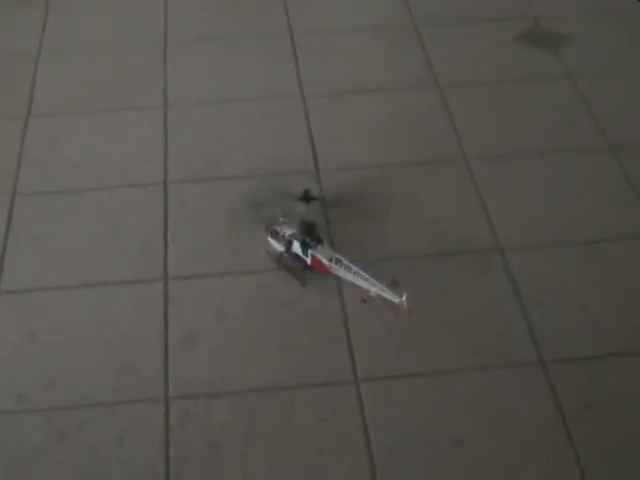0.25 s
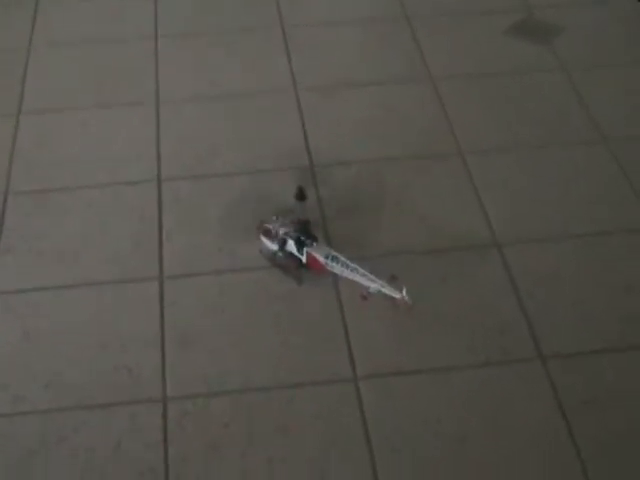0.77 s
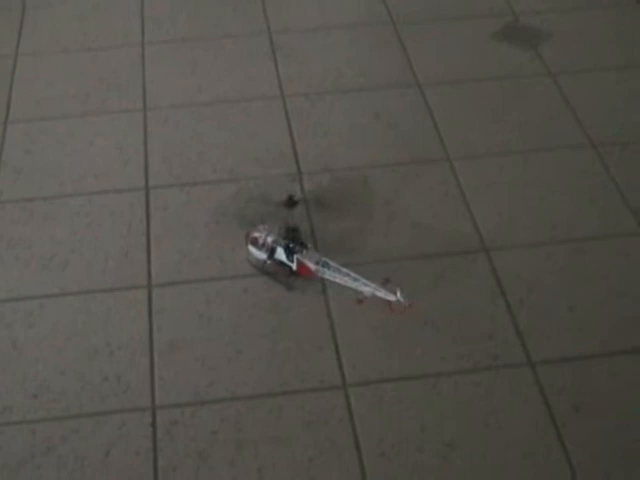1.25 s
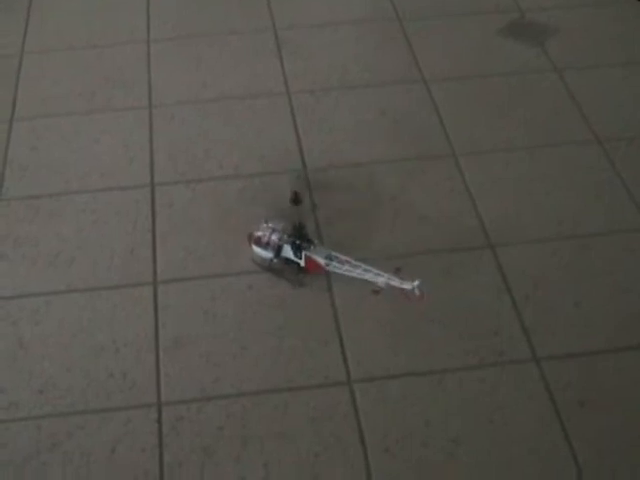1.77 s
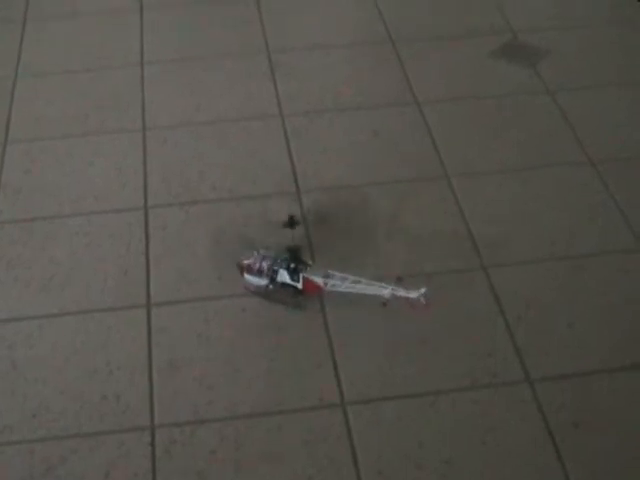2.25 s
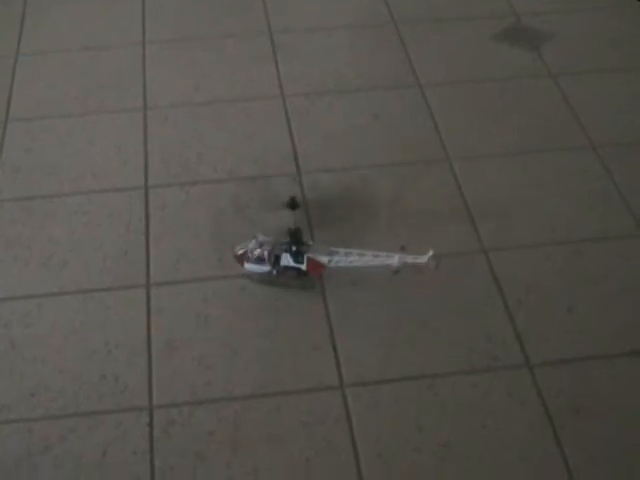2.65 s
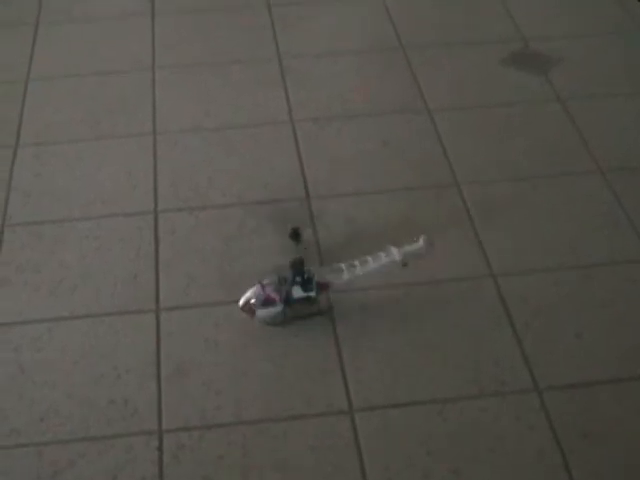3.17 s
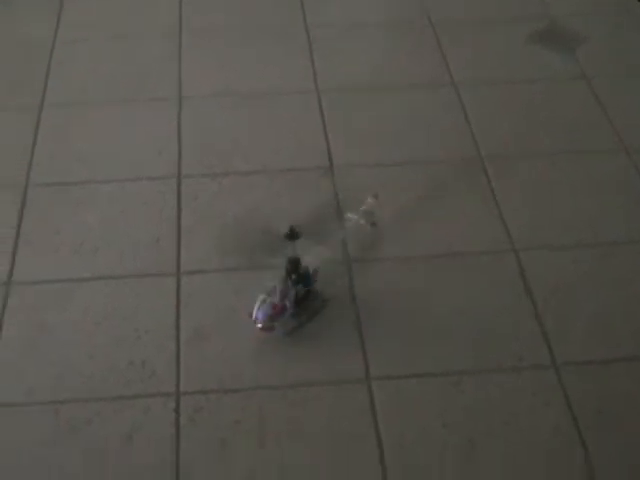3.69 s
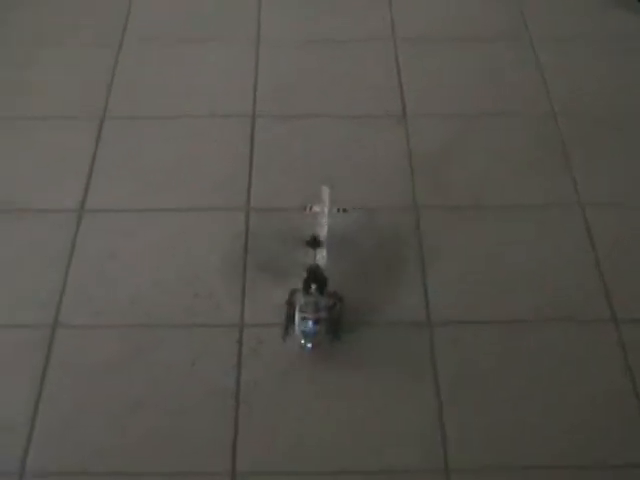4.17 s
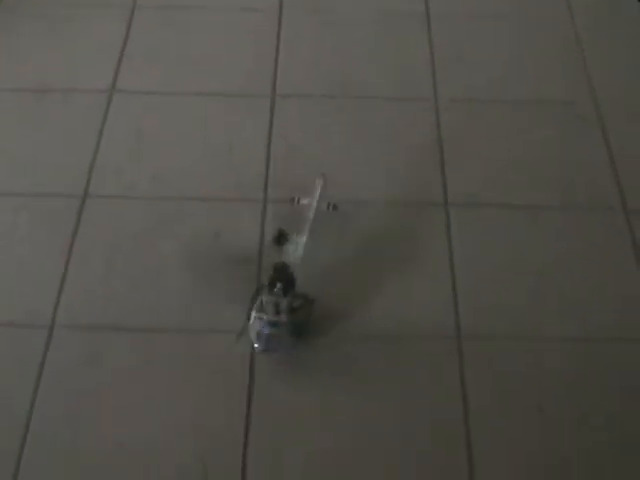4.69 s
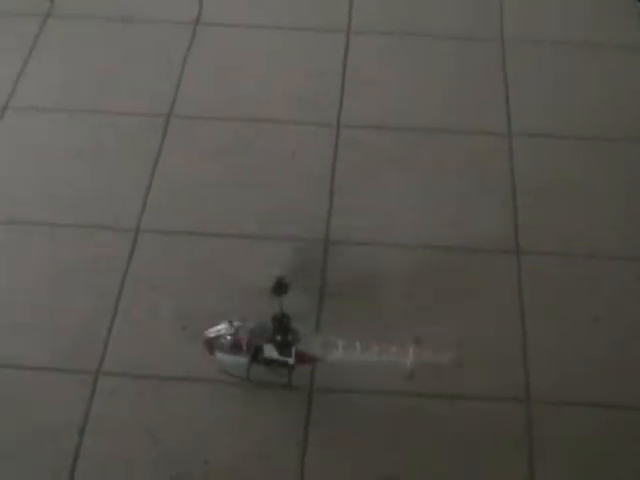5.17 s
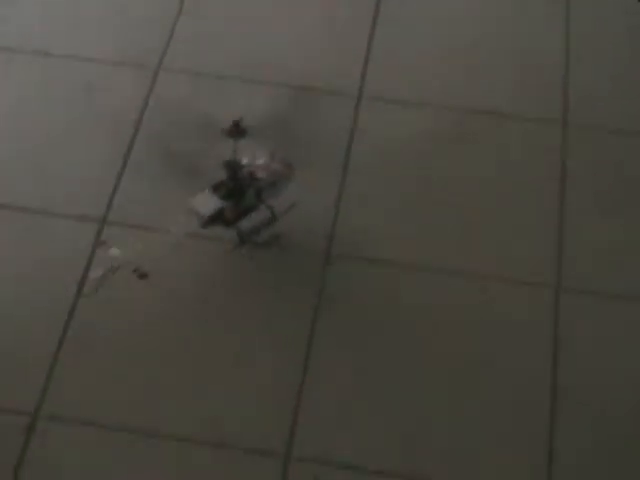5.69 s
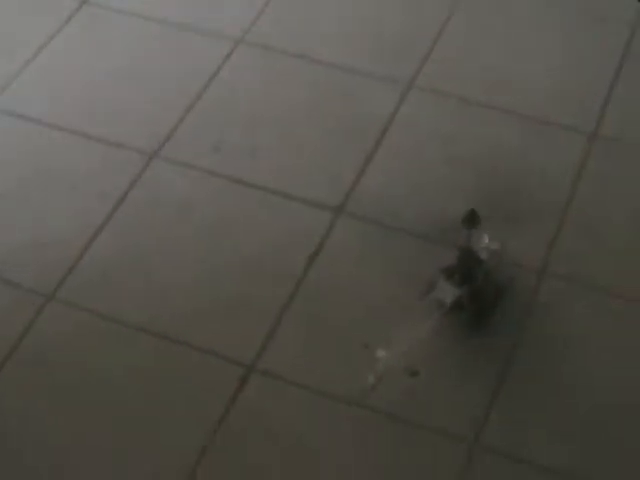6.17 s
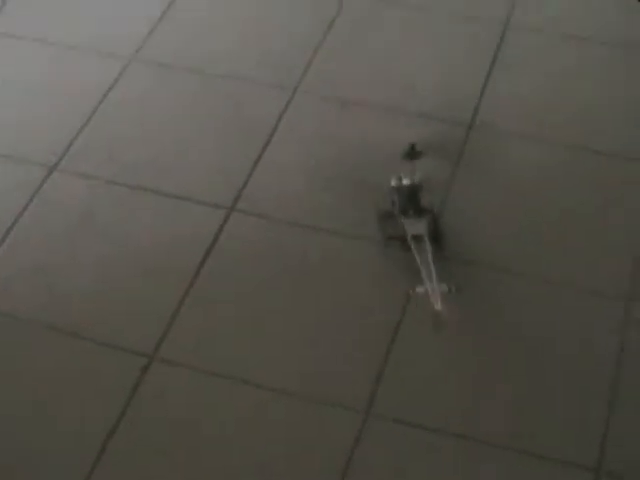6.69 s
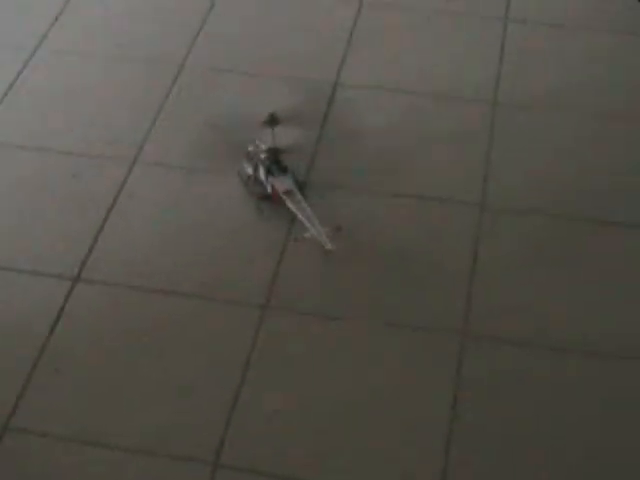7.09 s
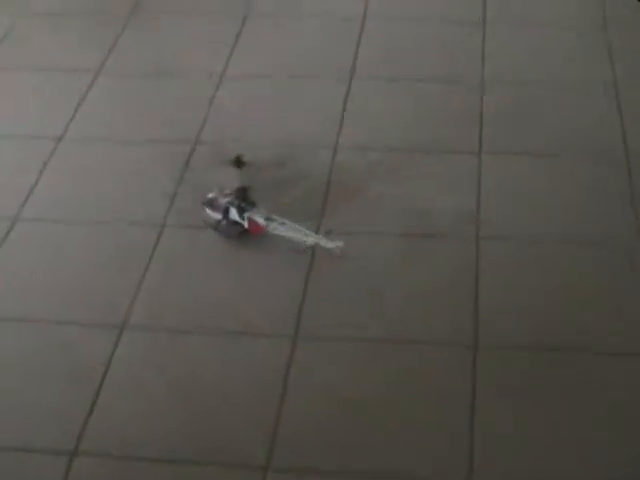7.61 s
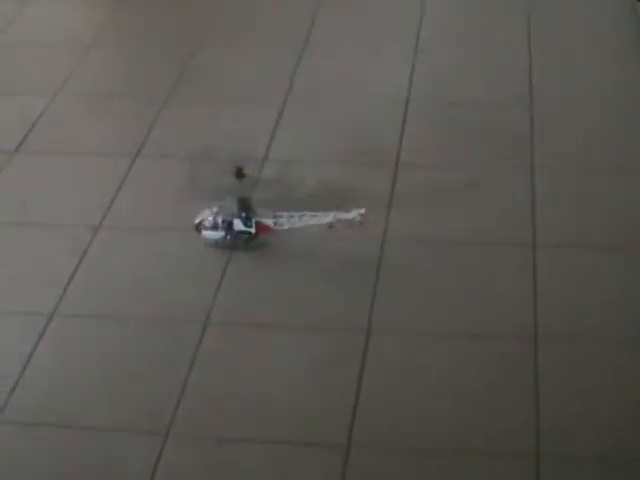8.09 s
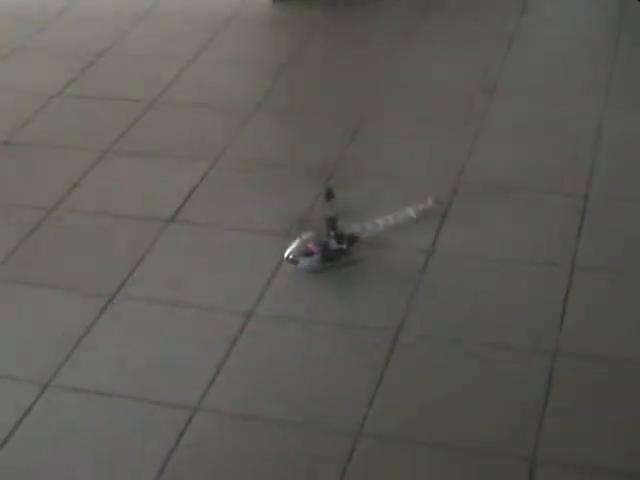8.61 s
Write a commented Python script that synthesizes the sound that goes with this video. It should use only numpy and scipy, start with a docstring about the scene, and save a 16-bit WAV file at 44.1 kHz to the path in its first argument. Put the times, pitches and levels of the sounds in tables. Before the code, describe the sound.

At once a sharp, close tap on the microphone bumps out, overloaded and very short, followed by two faint dull knocks before 0.2 s. Under it a toy helicopter's two small electric motors are already whining. From 0 to about 3 s they climb, quickly at first, one a little behind the other, into a shrill buzzing pair of tones around 1.7 to 1.9 kHz with brighter overtones, gear rattle and a dry rush of blades. The whine holds fairly steady near 4 s, one motor still creeping up until 5.3 s. A soft knock comes at 4.8 s, a tight cluster at 5.6 to 5.7 s as that motor drops in pitch, and a faint one at 6.3 s. The sound flutters and throbs more until about 7.7 s, then settles; a last knock at 8.7 s. It is still running at the end, in a bare reverberant hall.

```python
"""In a bare, echoing hall, a toy helicopter with two stacked rotors runs up on a tiled floor.
Two small motors with eight-tooth pinions whine at their own speeds: shaken tones at shaft orders.
Gear rattle and blade rush are shaped noise; a few dull knocks are decaying sines in the hall.
One tap on the recorder opens the scene; two close microphone ports hear it all."""
import sys
import numpy as np
from scipy import signal
from scipy.fft import rfft, irfft, next_fast_len
from scipy.io import wavfile
from scipy.ndimage import uniform_filter1d

SR = 44100
rng = np.random.default_rng(int(sys.argv[2]) if len(sys.argv) > 2 else 0)


def int16_out(signal):
    """Quantize to a 16-bit WAV file."""
    q = np.round(np.clip(np.atleast_2d(signal).T, -1, 1) * 32767)
    wavfile.write(sys.argv[1], SR, q.astype(np.int16))


N = 390285


def gain_of(db):
    """Decibels to amplitude gain."""
    return 10 ** (np.asarray(db) / 20)


def evened(x):
    """Scales to rms 1."""
    return x / np.sqrt(np.mean(abs(x) ** 2) + 1e-20)


def read(points, hz):
    """Columns of a table interpolated on a log-frequency axis."""
    f, *columns = np.transpose(points)
    return np.array([np.interp(np.log(hz + 1), np.log(f + 1), c) for c in columns])


def curve(rows, t):
    """Columns of a table interpolated over time."""
    s, *columns = np.transpose(rows)
    return [np.interp(t, s, c) for c in columns]


def wobble(hz):
    """Complex low-passed noise, rms 1, wandering about hz times a second."""
    step = 32  # samples between drawn points
    pole = np.exp(-2 * np.pi * hz * step / SR)
    a, b = rng.standard_normal((2, N // step + 1))
    slow = evened(signal.lfilter([1], [1, -pole], a + 1j * b))
    return np.interp(np.arange(N) / step, np.arange(len(a)), slow)


# decay of the hall: [band_hz, t60_s]
HALL_DECAY = [(200, 1.74), (1500, 1.77), (8000, 0.14)]


def hall(x):
    """Sparse random-sign taps; each band dies at its own speed, with equal energy in all bands."""
    taps = np.zeros(2 * SR)
    at = np.arange(500, 2 * SR - 20, 20)
    taps[at + rng.integers(0, 20, len(at))] = rng.choice([-1., 1.], len(at))
    hz, t, bands = signal.stft(taps, SR, nperseg=512)
    t60 = read(HALL_DECAY, hz)[0][:, None]
    decayed = bands * gain_of(-60 * t / t60) / np.sqrt(t60)
    tail = signal.istft(decayed, SR, nperseg=512)[1]
    return signal.fftconvolve(x, tail / np.linalg.norm(tail))[:N]


# what the knocks ring with: [pitch_hz, level_db, t60_s]
KNOCK_RING = [(176.5, 0.5, 0.2), (266, -9, 0.19), (296, 3, 0.14), (367, -4, 0.082), (438, -1, 0.16)]
# knocks somewhere in the hall: [start_s, level_db, blow_hz, tick_amount, ring_share]
KNOCKS = [(0.075, -26, 390, 0.3, .05), (0.147, -30, 310, .3, .05), (4.801, -28, 358, -0.5, .3),
          (5.611, -24, 440, -.8, .4), (5.637, -18.5, 330, -5.5, .45), (5.667, -22, 280, .3, .4),
          (5.723, -24, 400, -.5, .3), (6.312, -29, 290, 0, .6), (8.722, -23.5, 400, -.5, .3)]


def knocks():
    """A sharp tick, a short blow at its own pitch, then the low ring of what was struck."""
    t, out = np.arange(SR // 4) / SR, np.zeros(N + SR)
    ring = sum(gain_of(db - 60 * t / t60) * np.sin(2 * np.pi * hz * t) for hz, db, t60 in KNOCK_RING)
    tick = gain_of(-60 * t / .006) * np.sin(2 * np.pi * 900 * t)
    blow_envelope = gain_of(-60 * t / .022) * (1 - np.exp(-t / .0015))
    for start_s, level_db, blow_hz, tick_amount, ring_share in KNOCKS:
        blow = blow_envelope * np.sin(2 * np.pi * blow_hz * t)
        knock = tick_amount * tick + 3.24 * blow + ring_share * ring
        out[round(start_s * SR):][:len(t)] += gain_of(level_db) * knock
    # heard from afar, without deep bass
    return signal.lfilter(*signal.butter(3, 135, "high", fs=SR), out[:N])


# thump and its bounce: [start_s, thump_db, ring_db]
TAPS = [(.0278, -1, -3.5), (.0377, -26, -10)]


def tap():
    """A tap on the case pushes the ports in opposite directions: a sagging thump and a short ring."""
    t, out = np.arange(SR // 10) / SR, np.zeros(N)
    # the thump's pitch falls as the case settles
    thump = gain_of(-60 * t / .03) * np.sin(5.6 * np.log(1 + t / .002))
    ring_turns = 800 * t + .3 * (1 - np.exp(-t / .0005))
    ring = gain_of(-60 * t / .02) * np.sin(2 * np.pi * ring_turns)
    for start_s, thump_db, ring_db in TAPS:
        out[round(start_s * SR):][:len(t)] += gain_of(thump_db) * thump + gain_of(ring_db) * ring
    push = np.zeros(N)  # brief, shared by both ports
    push[round(TAPS[0][0] * SR):][:len(t)] = gain_of(-12) * np.exp(-.5 * ((t - .0009) / .0003) ** 2)
    return np.array([out, -.96 * out]) + signal.lfilter(*signal.butter(2, 380, "high", fs=SR), push)


# first motor shaft: [time_s, speed_hz]
SPEED_A = [(0, 129.5), (.61, 158.2), (.8, 163), (1.91, 183.9), (2.4, 190.1), (2.83, 201.8), (3.36, 209.5),
           (3.7, 212.3), (4.32, 213.2), (4.4, 219.3), (4.6, 223.2), (4.9, 228), (5.17, 230.5),
           (5.29, 235.5), (5.5, 235.5), (5.72, 209), (5.92, 205.3), (6.1, 209), (6.3, 212.7), (6.55, 213.8),
           (6.88, 211.8), (7.17, 215.5), (7.45, 209.8), (7.8, 211.5), (8.18, 213.2), (8.85, 214)]
# second motor shaft: [time_s, speed_hz]
SPEED_B = [(0, 161.9), (.38, 184.6), (.61, 195.3), (.8, 198.5), (1.2, 199.8), (1.4, 207.3), (1.7, 211.2),
           (1.91, 219.6), (2.4, 221.5), (2.63, 232.4), (4.5, 232.3), (4.62, 230), (4.85, 228.6),
           (5.3, 228.3), (5.4, 225.5), (5.66, 234.1), (6.05, 227.2), (6.55, 228.9), (7.17, 229.5),
           (7.43, 232.9), (7.8, 230.6), (8.4, 229.4), (8.85, 230.6)]


def speeds(t):
    """Shaft speeds of both motors."""
    return curve(SPEED_A, t) + curve(SPEED_B, t)


# rush of blades and gears: [time_s, level_db, brightness_db_per_octave], from 1.5 to 6 kHz
RUSH = [(0, -23.5, -1), (.6, -22.5, 1), (1.5, -21, 1.5), (2.7, -21.5, 3), (3.8, -20, 2), (5.2, -22.5, 3),
        (6.0, -21.5, 3), (7.2, -19.5, 1.5), (8.85, -22, 2.5)]
# hollow body and microphone colour: [freq_hz, gain_db]
BODY = [(40, -23), (130, -17), (600, -10), (780, -5.5), (870, 3), (1350, 2), (2100, -7.5), (2800, -2),
        (4100, -5), (5200, 0), (6000, -7), (9500, -11), (11000, -14), (11900, -30.5), (14000, -58)]
# gear rattle bunches: [shaft_multiple, width_hz, lift_db]
RATTLE = [(7.96, 51, 5), (16.17, 150, 3), (22.7, 65, 2)]


def rush():
    """Noise through the body, bunched around the gear mesh, with drifting patches."""
    size, hop = 1024, 256
    frames, hz = N // hop + 5, np.fft.rfftfreq(size, 1 / SR)[:, None]
    t = (np.arange(frames) - 2) * hop / SR
    a, b, patches = rng.standard_normal((frames, size // 2 + 1, 3)).T
    patches = evened(uniform_filter1d(uniform_filter1d(patches, 10, 0), 16, 1))
    level_db, bright_db = curve(RUSH, t)
    field_db = read(BODY, hz)[0] + level_db + .94 * patches
    field_db += bright_db * np.clip(np.log2((hz + 1) / 1500), 0, 2)
    for speed_hz in speeds(t):
        for k, width_hz, lift_db in RATTLE:
            field_db += lift_db * np.exp(-.5 * ((hz - k * speed_hz) / width_hz) ** 2)
    noise = signal.istft((a + 1j * b) * gain_of(field_db), nperseg=size, noverlap=size - hop)[1][:N]
    return gain_of(-19.5) * noise


def tone(turns, db, rough, wobble_hz):
    """A line whose strength and phase are shaken at random."""
    shake = (1 + rough * wobble(wobble_hz)) / np.sqrt(1 + rough ** 2)
    spin = np.exp(2j * np.pi * (turns + rng.random()))
    return np.sqrt(2) * gain_of(db) * (shake * spin).real


# whines of each motor, one, two, three times the mesh, then fifth order: shaft_multiple
ORDERS = (8, 16, 24, 5)
# frame resonances lifting any whine that passes: [center_hz, width_hz, lift_db]
FRAME = [(902, 59, 12), (1204, 96, 9.5), (1663, 16.5, 3.5), (2680, 61, 3.5), (3332, 30, 5.5),
         (3560, 114, 6.5), (4920, 356, 17.5)]
EFFORT_DB, CRUISE_HZ = 27.5, 227  # whine growth for a tenfold speed, reference shaft speed


def whines(table, speed_hz, swell_db, own_db):
    """Level of each whine from effort, frame resonances, the shared swell and its own swell."""
    effort_db = EFFORT_DB * np.log10(speed_hz / CRUISE_HZ)
    lines = []
    for k, (db, share), extra_db in zip(ORDERS, table, own_db):
        frame_db = sum(lift_db / (1 + ((k * speed_hz - hz) / width_hz) ** 2)
                       for hz, width_hz, lift_db in FRAME)
        lines.append((k, db + frame_db + share * swell_db + effort_db + extra_db))
    return lines


# whines of the first motor, one row per order: [level_db, swell_share]
MESH_A = [(-28.5, 0.93), (-31, 0.24), (-42.5, .3), (-45, 0.14)]
# whines of the second motor, one row per order: [level_db, swell_share]
MESH_B = [(-33, 0.91), (-32.5, 0.21), (-42.5, 0.87), (-41.5, 0.85)]
# whines swell and sink over time, each by its own curve:
# [time_s, swell_a_db, twice_mesh_a_db, thrice_mesh_a_db, swell_b_db, fifth_order_b_db]
SWELL = [(0, 3.5, -12, -6, 0, -25), (.6, -4.5, 3.5, -3, 1, -2), (1.5, 1, 1.5, 3, 4, -4),
         (2.1, 3, 1.5, 4, 7.5, 0), (2.9, -6, 4.5, -4, 1, 0.5), (3.25, 5, -7.5, -5, 0, -5.5),
         (3.9, -0.5, -0.5, -4, 0, -1), (4.33, 2, -6, -8, -3, -1), (4.42, 4, -13, 3, -4.5, 6.5),
         (5, -4.5, 6, -6, 4, 4), (5.5, -4, -5, 11, 6.5, -9), (5.84, -7.5, -3, -1, -2.5, -3),
         (6.12, -1, 0.5, -22, 2.5, -13), (6.7, 1, 0.5, -21, -4, 11.5), (7.2, 2.5, -8, -11, 5, -2.5),
         (7.6, 0, 3, -1, -1, -2), (8.1, 2, -14, -3, 5, -7), (8.45, 3, -2.5, 3, 6, -13),
         (8.85, 4, -7, -1, 7, -10)]
# second motor's thrice-mesh whine comes and goes on its own: [time_s, gain_db]
THRICE_B = [(0, 5), (1, -3), (2.4, 1.5), (2.7, 7), (3.2, 8), (3.6, -1), (4.6, -10), (5.2, 2), (5.8, -2)]
# uneven teeth of the second pinion: [shaft_multiple, level_db, growth_db_per_tenfold_speed]
UNEVEN_B = [(6, -42, -30), (11, -30.5, 0), (13, -29.5, 0), (15, -32.5, 90), (21, -34, 0), (23, -35.5, -30)]
# beats of the crossing blades: [crossing_multiple, level_db, growth_db_per_tenfold_speed]
BLADES = [(1, -58, 60), (2, -58, -30), (3, -58, 30)]
# low throb at a little under half the blade-crossing rate, stronger from 5.8 s: [time_s, level_db]
THROB = [(0, -61), (5.5, -57), (5.8, -45), (7.8, -53), (8.85, -54)]
# unsteadiness of speed and whines: moderate at first, steadiest near 4 s,
# strongest from 4.8 to 7.7 s: [time_s, share]
UNSTEADINESS = [(0, .7), (2.6, .7), (3.6, .4), (4.4, .4), (4.8, 1.1), (7.7, 1.2), (8.0, .6), (8.85, .7)]
# mesh and twice-mesh whines mirrored below the switching rate: gain_db relative to the whine
MIRROR_DB = (-31.5, -22)
# thin steady whistle: [time_s, level_db]
WHISTLE = [(0, -40), (5, -45), (6.5, -58)]
CROSSING = .2325  # blade crossings per turn of both motor shafts together
RUNOUT_RAD = .59  # out-of-round big gears swing each whine; at the mesh, for unsteadiness share 1
SWITCH_HZ, WHISTLE_HZ = 16000, 1911  # the speed controllers chop the current at SWITCH_HZ


def motors():
    """Shaft orders of both motors, blade beats, switching mirrors and whistle; high orders shake more."""
    t, out = np.arange(N) / SR, np.zeros(N)
    speed_a, speed_b = speeds(t)
    swell_a, twice_db, thrice_db, swell_b, fifth_db = curve(SWELL, t)
    mesh_a = whines(MESH_A, speed_a, swell_a, (0, twice_db, thrice_db, 0))
    mesh_b = whines(MESH_B, speed_b, swell_b, (0, 0, curve(THRICE_B, t)[0], fifth_db))

    # weak orders leave through the body
    growth_b = np.log10(speed_b / CRUISE_HZ)
    uneven = [(k, db + grow_db * growth_b + 2.4 * read(BODY, k * speed_b)[0])
              for k, db, grow_db in UNEVEN_B]
    # every other tooth of the first pinion bites harder
    half_mesh = [(4, -41 + 2 * read(BODY, 4 * speed_a)[0])]

    crossing = CROSSING * (speed_a + speed_b)  # the rotors turn against each other
    beats = [(k, db + grow_db * np.log10(crossing / 103)) for k, db, grow_db in BLADES]
    beats.append((.46, curve(THROB, t)[0]))

    unsteady = curve(UNSTEADINESS, t)[0]
    groups = ((speed_a, mesh_a + half_mesh, .28, RUNOUT_RAD),
              (speed_b, mesh_b + uneven, .32, RUNOUT_RAD),
              (crossing, beats, .5, 0))
    for speed, lines, rough, runout in groups:
        # gusts on the blades make the speed flutter
        flutter = 1 + .0022 * unsteady * wobble(8).real
        turns = np.cumsum(speed * flutter) / SR
        swing = runout * unsteady * np.sin(np.pi * CROSSING * turns) / (2 * np.pi)
        for k, db in lines:
            line_turns = k * turns + swing * np.sqrt(k / ORDERS[0])
            line_rough = rough * unsteady * (1.3 + (k / 21) ** 2)
            out += tone(line_turns, db, line_rough, 5 + 1.1 * k)

    for speed, mesh in ((speed_a, mesh_a), (speed_b, mesh_b)):
        for (k, db), mirror_db in zip(mesh, MIRROR_DB):
            mirror_turns = SWITCH_HZ * t - k * np.cumsum(speed) / SR
            out += tone(mirror_turns, db + mirror_db, .38, 40)
    return out + tone(WHISTLE_HZ * t, curve(WHISTLE, t)[0], .17, 4.7)


LINGER_HZ, LINGER_WIDTH_HZ, LINGER_DB = 1703, 2.5, 4


def linger(whine):
    """A sharp resonance holds the whine after it has moved on."""
    r = np.exp(-np.pi * LINGER_WIDTH_HZ / SR)
    poles = [1, -2 * r * np.cos(2 * np.pi * LINGER_HZ / SR), r ** 2]
    held = signal.lfilter([1 - r, 0, r - 1], poles, whine)
    return whine + gain_of(LINGER_DB) * held


# microphone ports: [freq_hz, likeness_0_1, left_lead_rad, left_minus_right_db]
PORTS = [(60, .97, 2.75, -.3), (120, .94, 2.2, 0), (260, .9, .9, .3), (600, .92, .28, -1.5),
         (1000, .96, 0, -1.7), (2200, .94, -.2, -1.3), (5500, .95, -1.15, -1), (8500, .72, -1.8, .8),
         (11500, .68, -2.8, 0)]


def ports(near):
    """Both ports hear the same sound, shifted in phase, plus a share of unrelated reflections."""
    size = next_fast_len(N)
    same, lead_rad, balance_db = read(PORTS, np.fft.rfftfreq(size, 1 / SR))
    same = np.clip(same, 0, 1)
    alike = np.sqrt((1 + same) / 2) * rfft(near, size)
    unlike = np.sqrt((1 - same) / 2) * rfft(hall(near), size)
    shift = np.exp(.5j * lead_rad) * gain_of(balance_db / 2)
    pair = np.array([(alike + unlike) * shift, (alike - unlike) / shift])
    return irfft(pair, size)[:, :N]


def scene():
    """Motors and knocks with their hall echo, plus rush, at both ports; the tap hits the ports directly."""
    whine, thuds = motors(), knocks()
    whine = linger(whine)
    whine = whine + gain_of(-7) * hall(whine)
    near = whine + thuds + gain_of(-.5) * hall(thuds) + rush()
    return ports(near) + tap()


CLIP, EDGE_HZ = .96, 14600  # overload level (full scale 1), band limit


def record(dry):
    """Overload flattens peaks beyond CLIP, such as the tap; a low-pass then limits the band."""
    lowpass = signal.firwin(511, EDGE_HZ, window=("kaiser", 9), fs=SR)
    return signal.oaconvolve(np.clip(dry, -CLIP, CLIP), lowpass[None], "same")


dry = scene()
out = record(dry)
int16_out(out)
```